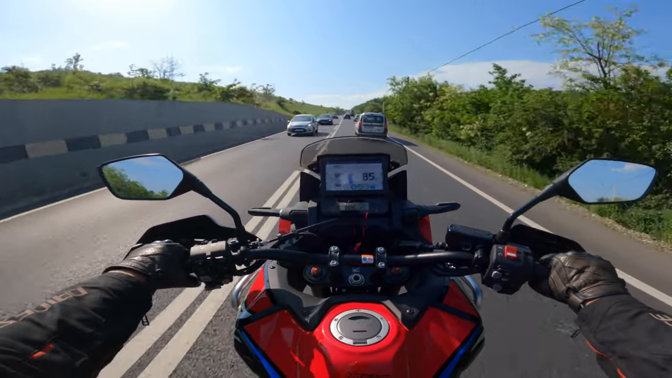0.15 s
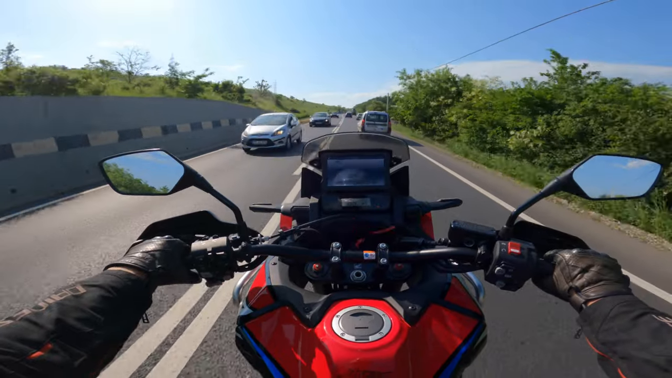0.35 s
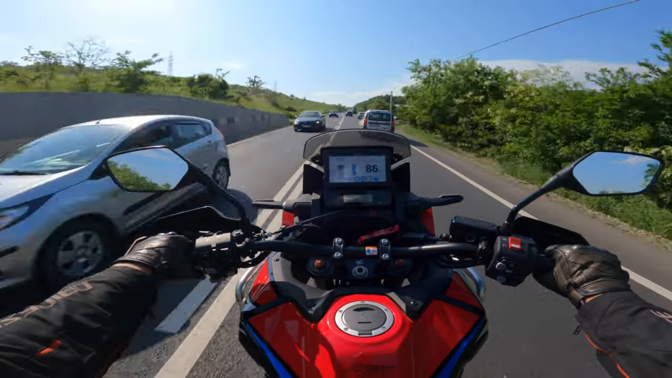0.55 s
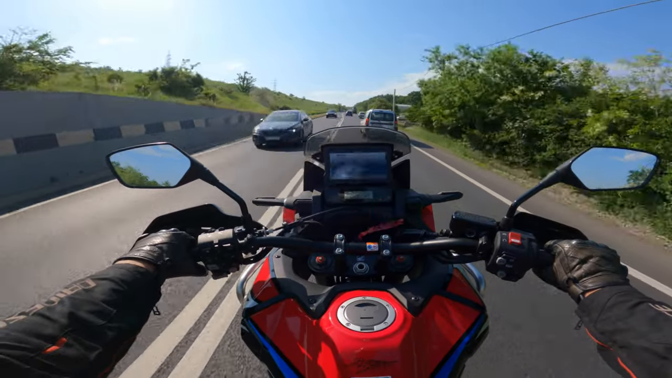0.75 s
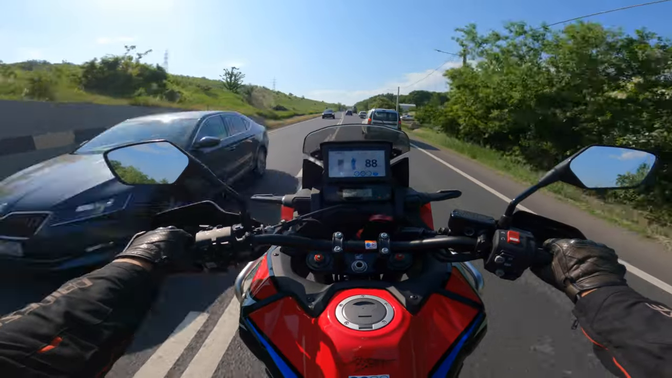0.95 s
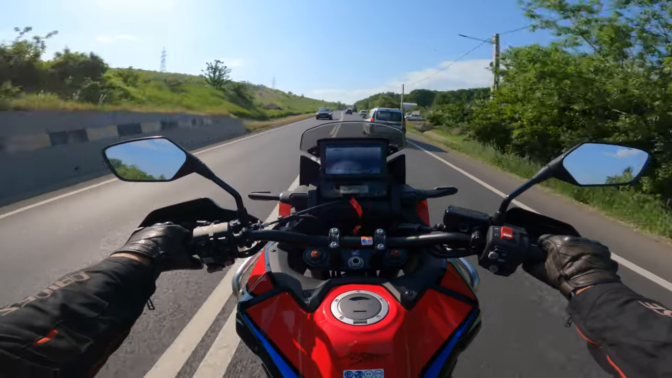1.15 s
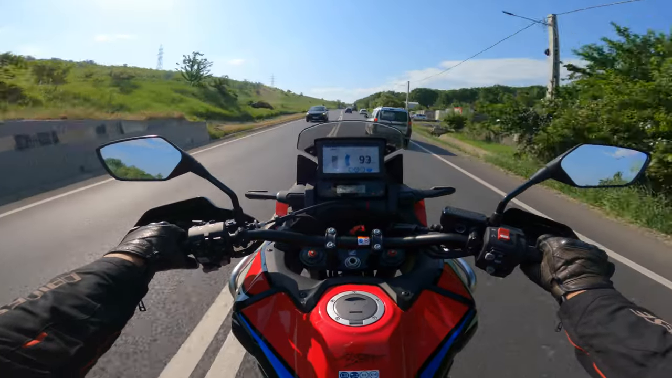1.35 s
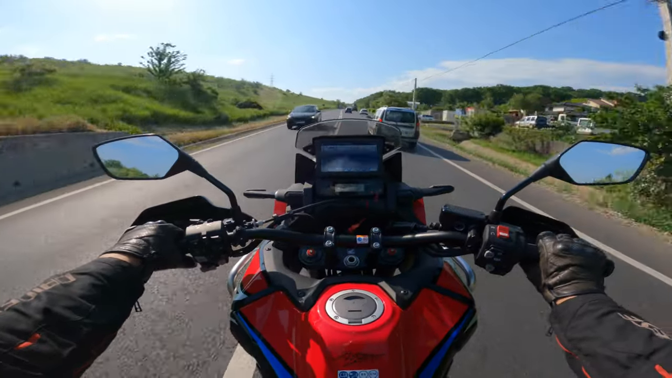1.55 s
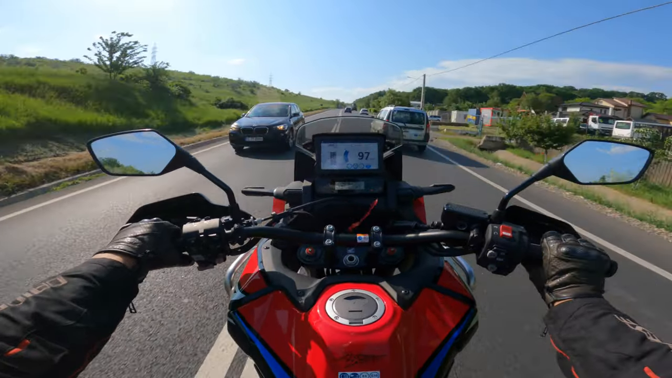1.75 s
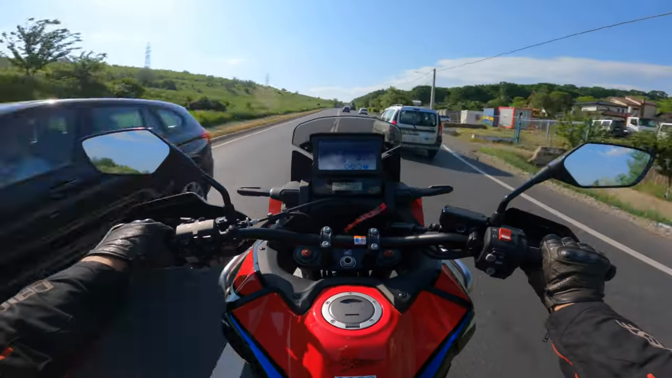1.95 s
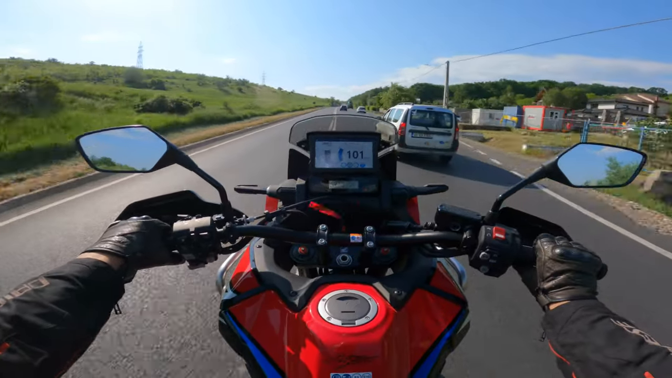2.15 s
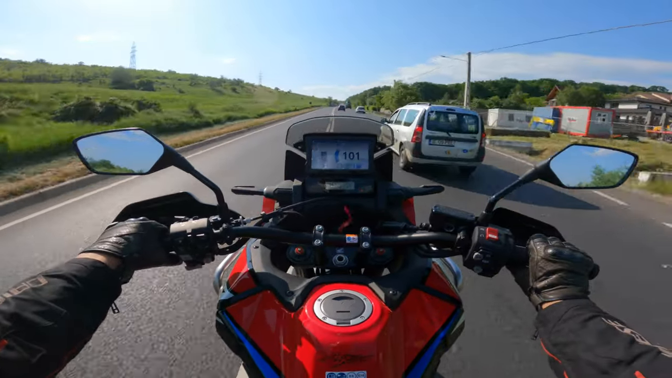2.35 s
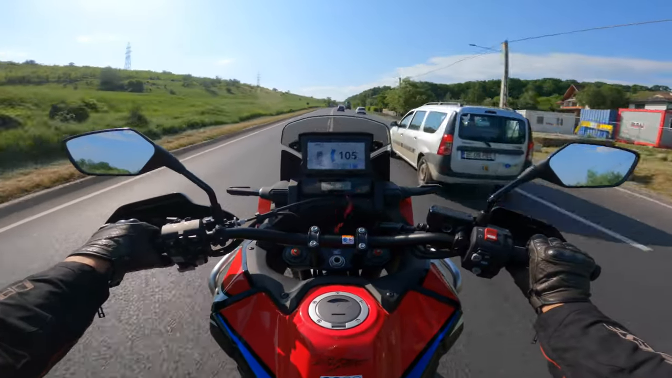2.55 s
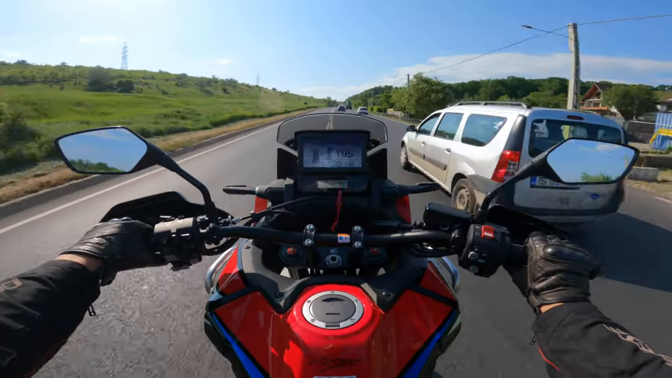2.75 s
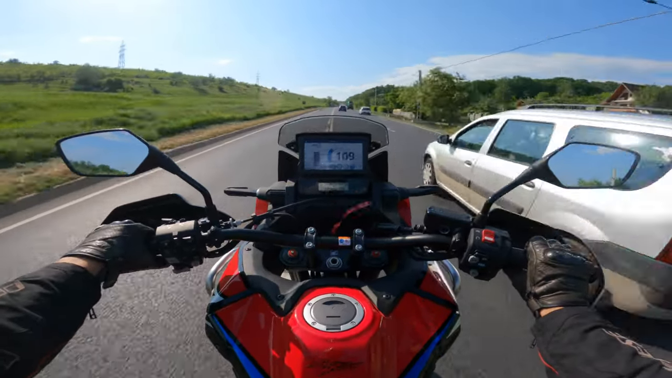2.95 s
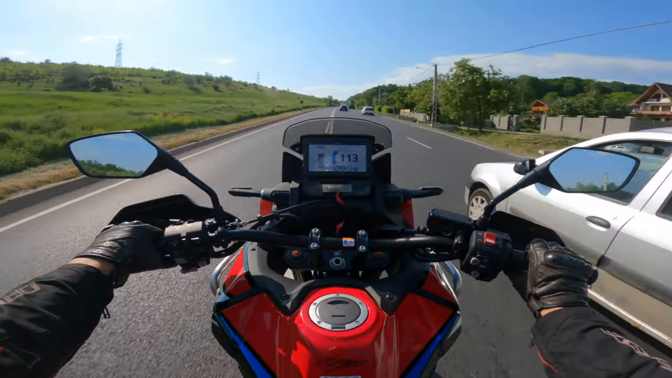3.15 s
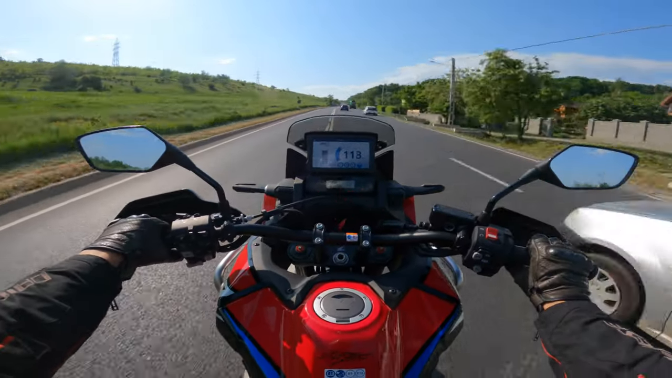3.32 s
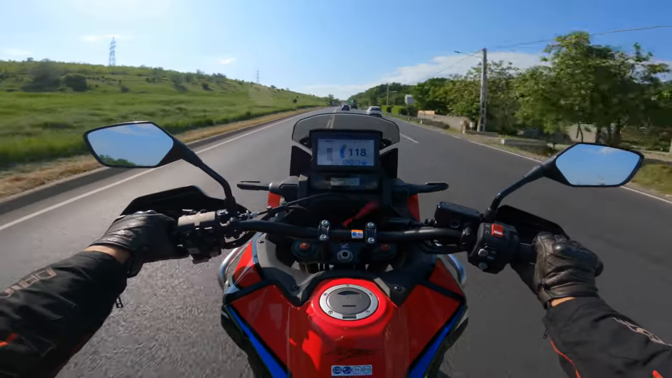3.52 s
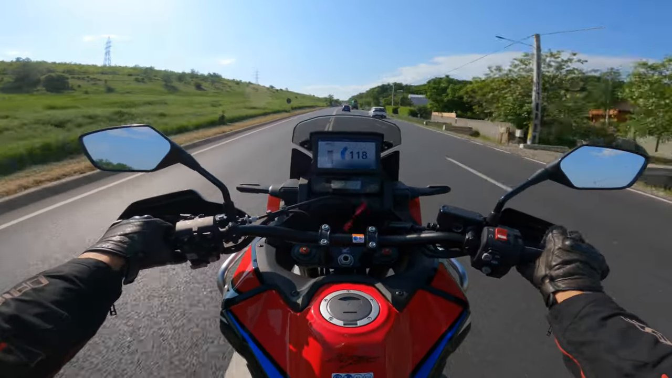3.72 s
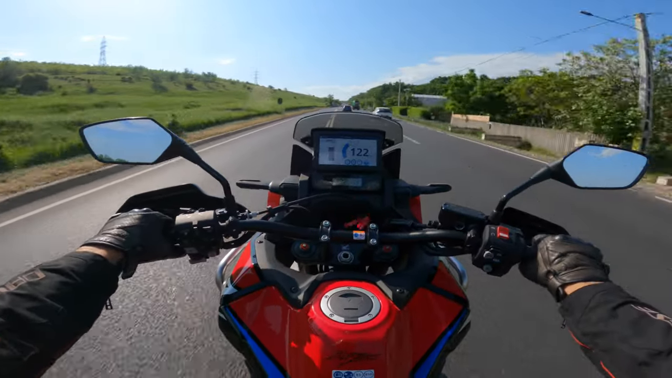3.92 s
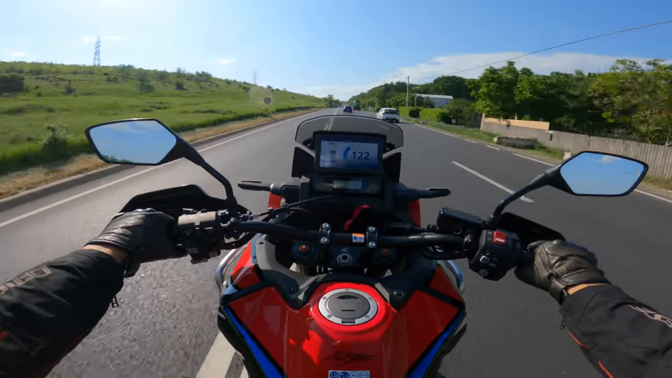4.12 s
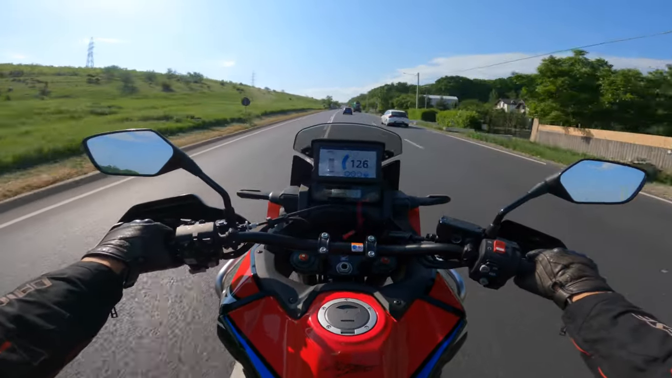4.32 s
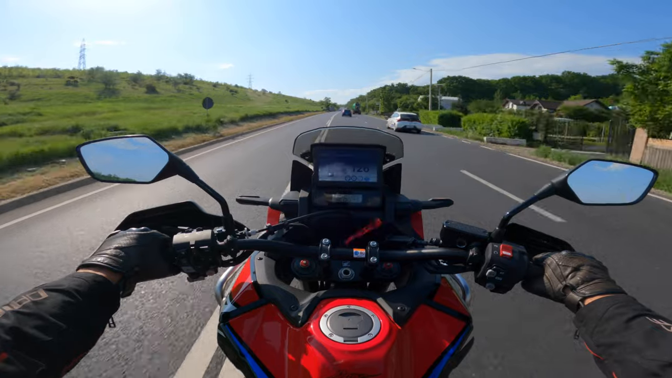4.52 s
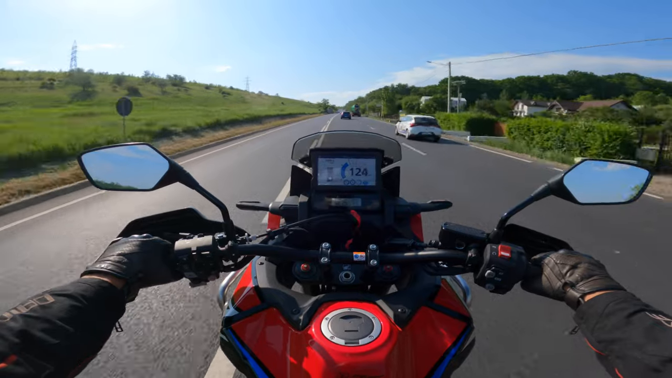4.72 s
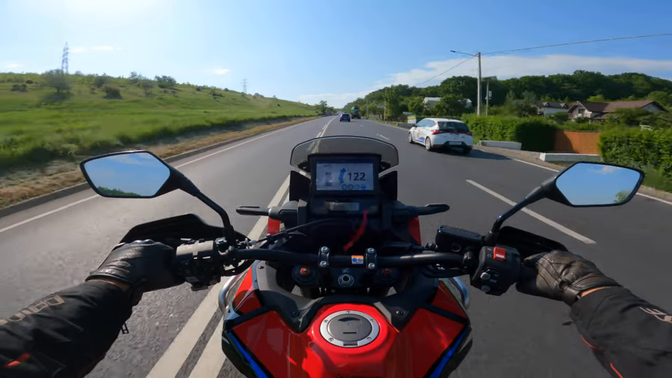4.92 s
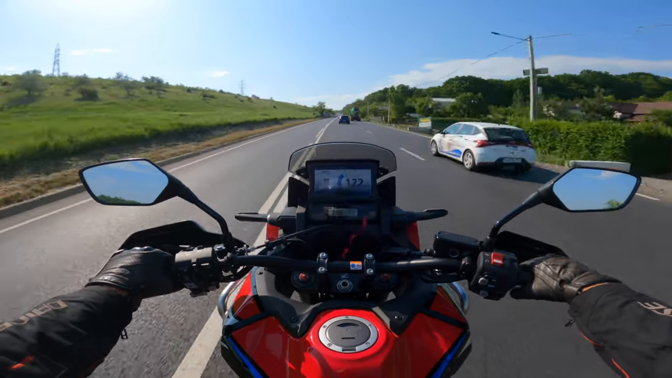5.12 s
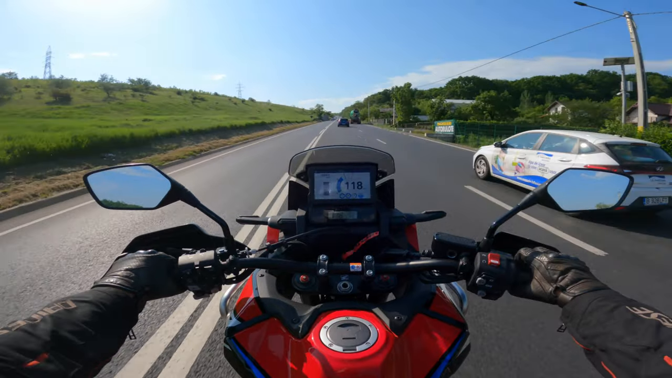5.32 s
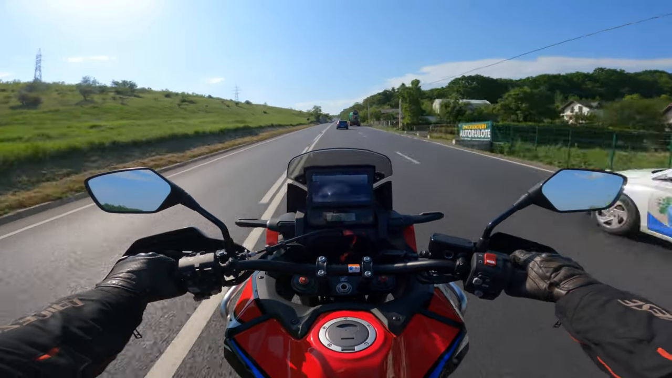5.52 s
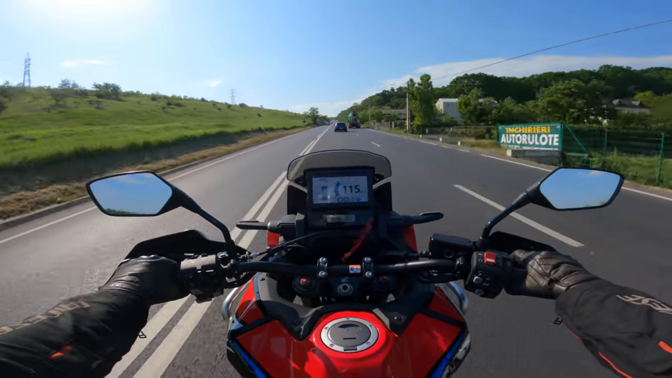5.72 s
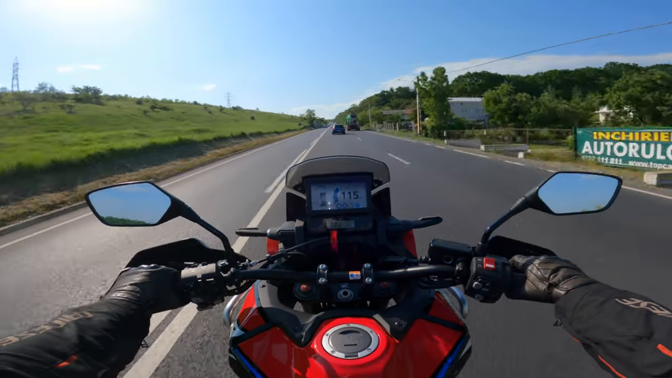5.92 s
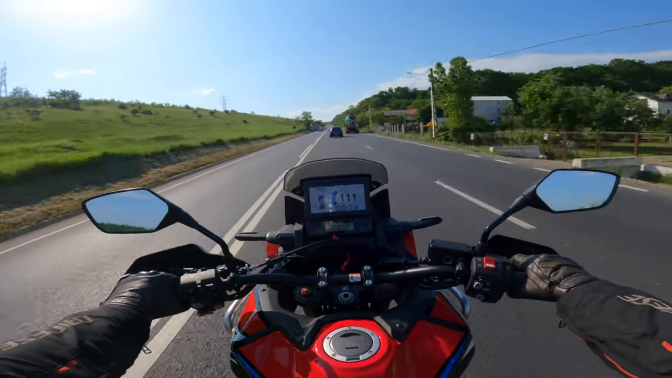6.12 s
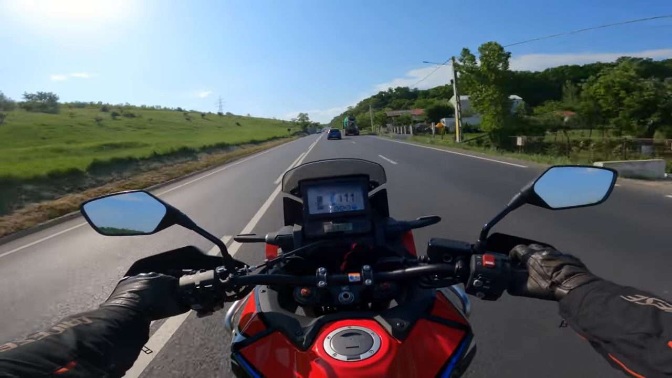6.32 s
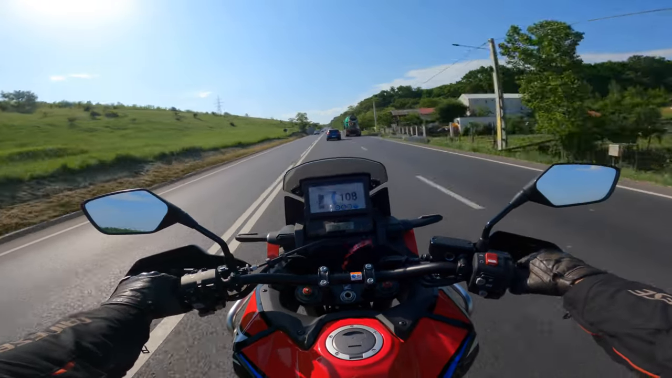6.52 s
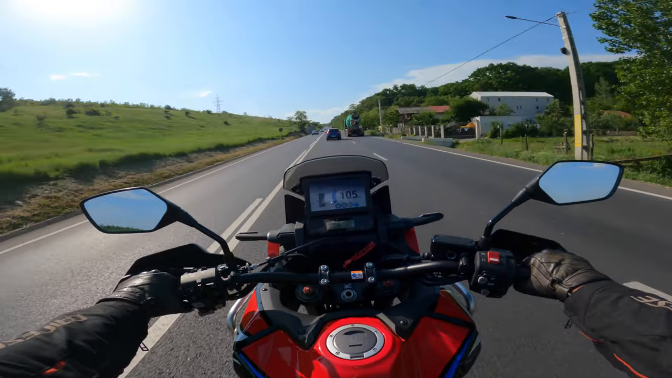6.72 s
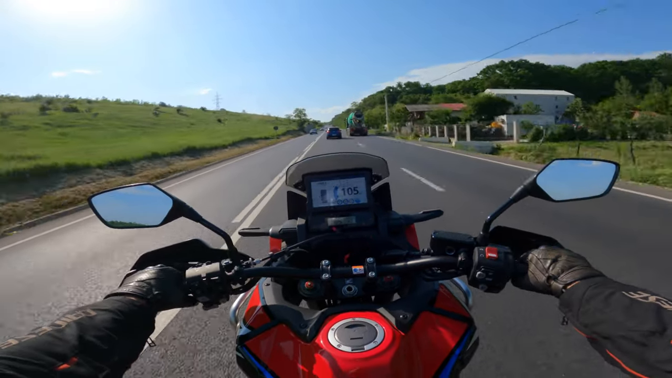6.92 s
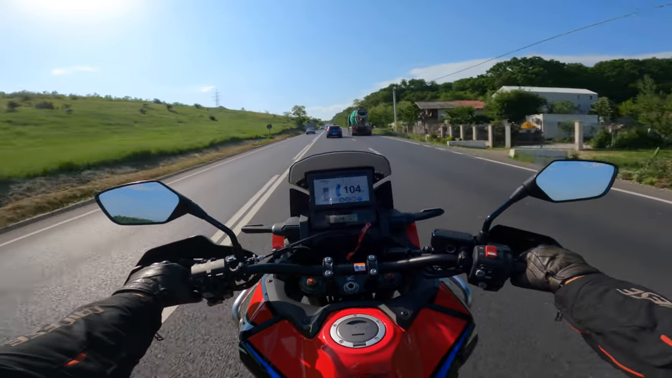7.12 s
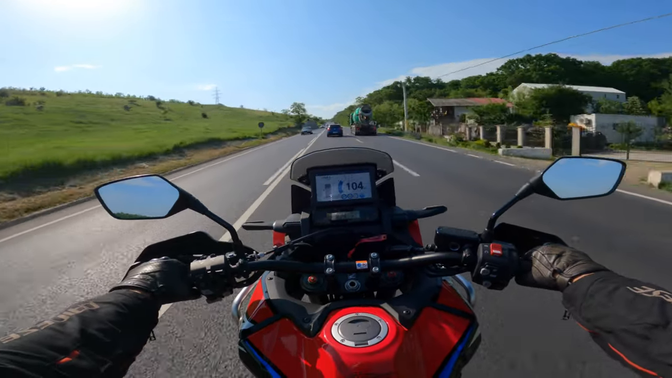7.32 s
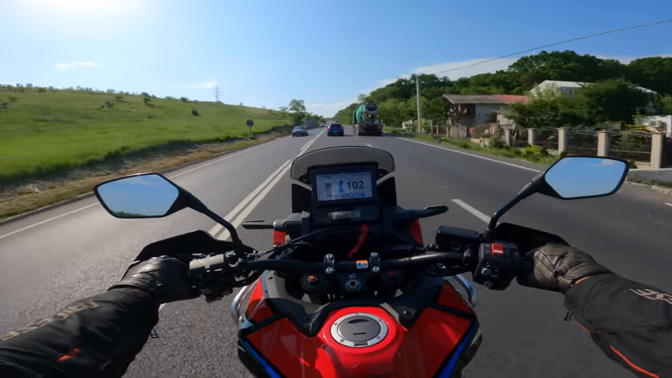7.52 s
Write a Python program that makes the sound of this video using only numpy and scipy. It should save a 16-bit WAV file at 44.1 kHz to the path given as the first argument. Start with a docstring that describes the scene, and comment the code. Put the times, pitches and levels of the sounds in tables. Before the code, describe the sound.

A two-cylinder motorcycle is heard from the rider's chest on an open road. The engine climbs steadily in pitch with a honking, rasping intake growl while oncoming cars give faint, brief hisses. About halfway the throttle shuts and the exhaust burbles as the pitch falls. Near the end the drive clunks with a small touch of throttle. Low wind buffeting, chain whine and engine clatter run throughout.

```python
"""Wind rumbles and a two-cylinder motorcycle speeds up to overtake, heard from the rider's chest.
With the throttle open, gulps of air make the airbox (the engine's air chamber) honk and rasp.
Then the throttle shuts, and weak firings burble in the exhaust pipe as the bike slows.
The drive chain whines with road speed, the engine clatters, and wind buffets the microphones."""
import sys
import numpy as np
from scipy import signal
from scipy.fft import rfft, irfft
from scipy.io import wavfile

SR = 44100
rng = np.random.default_rng(int(sys.argv[2]) if len(sys.argv) > 2 else 0)


def materialize(psi):
    """Save the field psi as 16-bit PCM at rate SR to the path in sys.argv[1].

    A 1-D psi becomes a single channel; in a 2-D psi each row is a channel.
    """
    bounded = np.clip(np.atleast_2d(psi).T, -1, 1)
    quanta = np.round(bounded * 32767).astype(np.int16)
    wavfile.write(sys.argv[1], SR, quanta)


N = 337806
TIME = np.arange(N) / SR
FREQS_HZ = np.fft.rfftfreq(N, 1 / SR)
INTAKE_LAG_S, RASP_LAG_S, EXHAUST_LAG_S = 0.12, 0.13, 0.16  # delays in following the throttle

# The two cylinders fire unevenly: place_in_cycle (0-1), strength
FIRINGS = [(0.428, 0.86), (0.803, 0.88)]
# Notes at which the engine cases ring: pitch_hz, width_hz, level_db
CASE_NOTES = [(1273, 20, -56.5), (1695, 53, -64), (2224, 70, -66)]


def gain_of(db):
    """Turn decibels into a volume multiplier."""
    return 10 ** (np.asarray(db) / 20)


def spectrum(rows, column=1):
    """Turn one column of decibels into a gain at every frequency."""
    rows = np.array(rows)
    return gain_of(np.interp(np.log(FREQS_HZ + 1), np.log(rows[:, 0]), rows[:, column]))


def bumps(hz, rows):
    """The gain at hz of a set of peaks and dips."""
    return gain_of(sum((db * np.exp(-((hz - centre) / width) ** 2) for centre, width, db in rows), 0 * hz))


def filtered(sound, gains):
    """Turn each frequency up or down by its own gain."""
    return irfft(rfft(sound) * gains, N)


def noise(shape):
    """Noise whose strength at each frequency follows the shape."""
    real, imaginary = rng.standard_normal((2, len(FREQS_HZ)))
    return irfft((real + 1j * imaginary) * shape, N) * np.sqrt(N * SR) / 2


def stereo_noise(rows):
    """Left and right noise: mid is what the ears share, side is how they differ."""
    mid, side = noise(spectrum(rows, column=1)), noise(spectrum(rows, column=2))
    return np.array([mid + side, mid - side])


def wander(hz, size=8192):
    """A smooth random wobble, about 1 in size, that changes up to hz times a second."""
    rates = np.fft.rfftfreq(size, TIME[-1] / size)
    slow = irfft(rfft(rng.standard_normal(size)) / (1 + (rates / hz) ** 4))
    return np.interp(TIME, np.linspace(0, TIME[-1], size), slow / slow.std())


def fuzzy_tone(cycles, width_hz):
    """A narrow band of noise that follows a pitch."""
    angle = 2 * np.pi * cycles
    return wander(width_hz / 2) * np.cos(angle) + wander(width_hz / 2) * np.sin(angle)


def swell(peak_s, length_s):
    """A smooth rise to 1 and back around a moment."""
    return np.exp(-(2 * (TIME - peak_s) / length_s) ** 2)


def puffs(events, hz, octaves):
    """Brief swells of one band of noise; high bands differ more between the ears."""
    band = np.exp(-np.log2((FREQS_HZ + 1) / hz) ** 2 / (2 * octaves ** 2))
    ears = np.array([noise(band), noise(band)])
    ears = ears + ears[::-1] / (1 + hz / 1500)
    return ears / ears.std() * sum(gain_of(db) * swell(s, length) for s, length, db in events)


def lagged(control, lag_s):
    """Follow a control sluggishly."""
    hold = np.exp(-1 / (lag_s * SR))
    return control[0] + signal.lfilter([1 - hold], [1, -hold], control - control[0])


def doublings(speed, cruise=40):
    """How many times the speed has doubled from cruising, in engine cycles a second."""
    return np.log2(speed / cruise)


def load_db(pull, source):
    """How loud one source is at this pull, from engine braking (negative) to full throttle."""
    # Loudness under load: pull_cycles_per_s2, honk_db, rasp_db, burble_db, chain_db, clatter_db
    levels = [(-5, -43, -32, -6.5, -39.5, -6.5), (-3.5, -47, -30, -2, -38, -2),
              (0, -40, -27.5, -9, -40, -3), (-0.5, -39, -21.5, -15, -37.5, -2.5),
              (2.5, -33, -10.5, -15.5, -38.5, -0.5), (3.5, -33, -7, -19.5, -34, -2.5),
              (3.5, -30.5, -6, -18, -33, -4.5), (4.5, -30.5, -8, -17.5, -32.5, -5),
              (4, -31, -7.5, -16, -33, -1.5)]
    pulls, *columns = np.array(levels).T
    return np.interp(pull, pulls, columns[["honk", "rasp", "burble", "chain", "clatter"].index(source)])


def wind(road_speed):
    """Lumpy buffeting on the microphones grows with road speed and jumps in gusts."""
    # Buffeting: pitch_hz, mid_db, side_db
    rumble = [(10, -71.5, -79.5), (25, -61, -58), (45, -55.5, -64), (70, -57.5, -54), (98, -62, -61),
              (182, -70.5, -69), (372, -78.5, -82.5), (1000, -105, -105), (4000, -140, -140)]
    # Gusts, lulls and the wakes of cars: peak_s, length_s, boost_db
    gusts = [(1.08, 0.18, 1.5), (1.697, .12, 5), (2.121, .14, 4), (3.37, 0.23, 3), (4.74, .25, 2.5),
             (6.77, .14, 4), (7.3, .7, -2.5)]
    gust_db = sum(boost * swell(s, length) for s, length, boost in gusts)
    return stereo_noise(rumble) * gain_of(0.64 + 17.5 * doublings(road_speed) + gust_db + 0.38 * wander(11))


def crackle(road_speed, snaps_per_s=350, spread_db=5):
    """Rough air makes the microphone cover crackle in clumps of tiny bright snaps."""
    # Spells of rough air: peak_s, length_s, boost_db
    rough_air = [(3.8, .9, 19), (5.75, 0.66, 7), (7.45, .3, 4)]
    sizes = gain_of(spread_db * np.minimum(rng.exponential(1, (2, N)), 5))
    hits = (rng.random((2, N)) < snaps_per_s / SR) * sizes
    snap = rng.standard_normal((2, 128)) * np.exp(-np.arange(128) / 22)
    snaps = signal.oaconvolve(hits * rng.choice([-1, 1], (2, N)), snap, axes=1)[:, :N]
    bright = np.exp(-np.log2((FREQS_HZ + 1) / 9000) ** 2)
    clumps = filtered(snaps, bright) * gain_of(3 * wander(17))
    rough_db = sum(boost * swell(s, length) for s, length, boost in rough_air)
    return clumps / clumps.std() * gain_of(-83 + 10.5 * doublings(road_speed) + rough_db)


def passing_cars():
    """Oncoming cars sweep past with a hiss."""
    # Cars: peak_s, length_s, level_db
    cars = [(0.718, .08, -76), (1.126, 0.12, -73), (2.08, .09, -64.5)]
    return puffs(cars, hz=7800, octaves=.32)


def rustles_and_ticks(tick_s=0.0027):
    """Short bright rustles in the wind, and a few sharp ticks."""
    # Rustles: peak_s, length_s, level_db
    rustles = [(2.338, .018, -71), (2.4, .022, -67), (2.615, .02, -71), (3.06, .015, -67),
               (3.14, .015, -67), (5.288, .02, -72), (5.8, .025, -68), (5.928, .035, -65),
               (5.977, .03, -66), (6.85, 0.029, -67)]
    # Ticks: peak_s, level_db
    ticks = [(6.648, -58), (7.355, -62), (7.547, -63)]
    rustling = puffs(rustles, hz=11500, octaves=.55)
    return rustling + puffs([(s, tick_s, db) for s, db in ticks], hz=8800, octaves=.52)


def drive_clunks():
    """The drive clunks as it takes up its slack."""
    # Clunks: peak_s, length_s, pitch_hz, level_db
    clunks = [(5.01, 0.029, 3500, -68), (6.778, 0.11, 89, -29.5), (6.823, 0.0092, 1500, -45.5)]
    return sum(puffs([(s, length, db)], hz, octaves=.52) for s, length, hz, db in clunks)


def chain(road_speed, pull, links_per_cycle=15.17, taut_db=-3.5, slack_boost_db=7):
    """Chain links strike the toothed wheel: a whine that grows under load, and a rattle when slack."""
    # Chain tones, the main whine first: multiple_of_link_rate, level_db, width_hz
    tones = [(1, 0, 2), (.99, -10, 80), (.977, -10, 2), (.945, -13, 2), (.88, -15, 2), (1.048, -14, 4),
             (2, -31, 8)]
    links = np.cumsum(links_per_cycle * road_speed * (1 + .0012 * wander(10))) / SR
    (multiple, db, width), *side_tones = tones
    whine = np.sqrt(2) * gain_of(db + 1.1 * wander(3 * width)) * np.sin(2 * np.pi * multiple * links)
    rattle = sum(gain_of(db) * fuzzy_tone(multiple * links, width) for multiple, db, width in side_tones)
    tension = lagged(pull, INTAKE_LAG_S)
    loose = gain_of(taut_db + slack_boost_db * np.exp(-tension ** 2))
    return (whine + rattle * loose) * gain_of(load_db(tension, "chain") + 10.5 * doublings(road_speed))


def bodywork(sound):
    """Reflections between the fuel tank and the front panels colour the noise."""
    # Peaks and dips: pitch_hz, width_hz, boost_db
    colour = [(1110, 35, 3), (1150, 70, 0), (1640, 99, 2.5), (1980, 45, -1), (2446, 80, -3.5),
              (2770, 86, 1), (3030, 110, 2), (3340, 190, -1), (4140, 170, -0.5), (4640, 160, -2),
              (5130, 130, -0.5), (7250, 470, 2), (8000, 300, -1)]
    return filtered(sound, bumps(FREQS_HZ, colour))


def bursts(cycles, strokes, lag, width, floor):
    """A loudness shape that rises once for each cylinder; lag and width are parts of a cycle."""
    opening = floor
    for place, strength in strokes:
        distance = (cycles - place - lag + .5) % 1 - .5
        opening = opening + strength * np.exp(-(distance / width) ** 2)
    return opening / np.sqrt(np.mean(opening ** 2))


def gears(cycles, revs):
    """Each gear tone swells as it glides through a ringing note of the engine cases."""
    # Gear whines: multiple_of_cycle_rate, level_db
    whines = [(29, -68), (40, -70.5), (59, -69), (61, -79.5)]
    peaks = [(hz, 70, 9) for hz, _, _ in CASE_NOTES]
    return sum(gain_of(db + 1.6 * wander(5)) * bumps(k * revs, peaks) * np.sin(2 * np.pi * k * cycles)
               for k, db in whines)


def valves(cycles, size=1024):
    """The valves repeat one pattern of fine ticks every cycle, which makes a high buzz."""
    pattern = irfft(np.exp(2j * np.pi * rng.random(size // 2 + 1)))
    ticks = np.interp(cycles % 1 * size, np.arange(size), pattern / pattern.std())
    bass_cut = 1 - np.exp(-(FREQS_HZ / 1300) ** 4)
    return filtered(ticks, bumps(FREQS_HZ, [(2100, 2500, 41.5)]) * gain_of(-47) * bass_cut)


def clatter(cycles, revs, pull):
    """Mechanical noise throbs with the firings and rings the cases; gears and valves sing along."""
    # Engine clatter and tyre roar: pitch_hz, mid_db, side_db
    roar = [(120, -71, -78), (383, -66, -80), (637, -59, -69), (763, -70.5, -79.5), (1060, -82.5, -71.5),
            (1440, -85, -88), (1680, -85, -86.5), (2230, -87.5, -93), (2830, -94.5, -105.5),
            (3650, -99, -103), (4940, -102, -109), (5650, -112, -114), (10500, -117, -116),
            (15500, -124, -124)]
    throb = bursts(cycles, FIRINGS, lag=0.084, width=0.21, floor=2.2) * gain_of(0.46 * wander(84))
    ring = np.array([sum(gain_of(db) * fuzzy_tone(hz * TIME, width) for hz, width, db in CASE_NOTES)
                     for _ in range(2)])
    ticking = gain_of(-50) * np.array([valves(cycles), valves(cycles)])
    level = gain_of(load_db(lagged(pull, INTAKE_LAG_S), "clatter") + 15 * doublings(revs))
    return (bodywork(stereo_noise(roar) * throb + ticking) + ring + gears(cycles, revs)) * level


def treble(pulses):
    """The part of the pulses above about 720 Hz."""
    return filtered(pulses, 1 - np.exp(-(FREQS_HZ / 720) ** 6))


def pulse_pair(cycles, revs, strokes, resonances, duct, ring_hz, damping):
    """Two pressure pulses a cycle, built of overtones that swell as they cross any resonances."""
    # Overtones of the engine: multiple_of_cycle_rate, intake_db, exhaust_db
    overtones = [(1, -24.5, -17), (2, 1.5, 2), (3, 1, 5.5), (4, -8, -16.5), (5, -2, 1.5), (6, 0.5, -5),
                 (7, -8.5, -27.5), (8, -9.5, -10.5), (9, -7.5, -12), (10, -15.5, -5), (11, -9, -8),
                 (12, -22, -7), (13, -18.5, -21), (14, -12.5, -20.5), (15, -25, -30.5), (16, -15.5, -30.5),
                 (17, -14.5, -12.5), (18, -19, -14.5), (19, -27.5, -21.5), (20, -22.5, -25.5),
                 (21, -22.5, -16.5), (22, -29.5, -16), (23, -23.5, -25.5), (24, -23.5, -19.5),
                 (25, -30.5, -28.5), (26, -26, -31.5), (27, -27.5, -22.5), (28, -35.5, -39.5),
                 (29, -36.5, -40), (30, -34, -31.5), (31, -32, -33), (32, -34.5, -43.5), (33, -28.5, -43.5),
                 (34, -35, -36.5)]
    hz = np.linspace(1, 2000, 1000)
    ring = 1 / (damping + 1j * (hz / ring_hz - ring_hz / hz))
    # The duct holds its own note back, so each pulse rings on.
    response = bumps(hz, resonances) * (ring / abs(ring)) ** 2
    pulses = 0
    for k, intake_db, exhaust_db in overtones:
        level = gain_of(intake_db if duct == "intake" else exhaust_db)
        timing = sum(strength * np.exp(-2j * np.pi * k * place) for place, strength in strokes)
        tone = np.exp(2j * np.pi * k * cycles) * timing / abs(timing)
        pulses = pulses - level * (np.interp(k * revs, hz, response) * tone).real
    return np.sqrt(2) * pulses


def exhaust(cycles, revs, pull, lurch):
    """Weak, uneven firings thud in the pipe with the throttle shut, and spit during the long coast."""
    # Gas hissing from the pipe: pitch_hz, mid_db, side_db
    hiss = [(400, -83, -100), (850, -80.5, -75), (1130, -90.5, -80), (1450, -94.5, -89.5),
            (2000, -95.5, -92), (3060, -100, -100), (4900, -108, -112), (7000, -125, -125)]
    # The long coast, when the pipe turns raspy: start_s, end_s, fade_s, spit_db
    coast = (5.0, 6.82, .05, 2.4)
    start_s, end_s, fade_s, spit_db = coast
    coasting = (np.tanh((TIME - start_s) / fade_s) - np.tanh((TIME - end_s) / fade_s)) / 2
    thuds = pulse_pair(cycles, revs, FIRINGS, [], "exhaust", ring_hz=680, damping=0.34)
    thuds = thuds + (0.87 * coasting - .75) * treble(thuds)  # bright in the coast, muffled outside it
    burble_db = load_db(lagged(pull, EXHAUST_LAG_S), "burble") + 5.5 * doublings(revs)
    level = gain_of(burble_db - 2.9 * abs(lurch) + 0.4 * wander(53))  # falters while the drive is slack
    spurts = bursts(cycles, FIRINGS, lag=.03, width=.06, floor=.1)
    spit = bodywork(stereo_noise(hiss) * spurts) * coasting * gain_of(spit_db)
    return (gain_of(-36) * thuds + spit) * level


def intake(cycles, revs, pull, lurch, close_s=7.3, fade_db_per_s=45):
    """Each gulp of air thumps the airbox (the honk) and tears past the throttle plate (the rasp)."""
    # The two cylinders draw air unevenly: place_in_cycle (0-1), strength
    gulps = [(0.274, 0.98), (0.609, 0.63)]
    # Resonances of the airbox and tank: pitch_hz, width_hz, boost_db
    airbox = [(63, 13.6, -12.5), (84.8, 6, -5), (203, 25.5, 4), (244.4, 15.7, 4.5), (274.9, 17.7, 8.5),
              (308.4, 6.6, 6.5), (368.5, 22, -5.5), (473, 23, 2.5), (494, 76, 6.5), (583, 39, 3),
              (790, 80, 9), (1220, 230, -13)]
    # Rushing air: pitch_hz, mid_db, side_db
    rush = [(60, -75.5, -86), (170, -70.5, -79.5), (400, -56.5, -67), (640, -58, -62), (1000, -66.5, -62),
            (1280, -77, -69), (1680, -71, -67), (2550, -79.5, -82.5), (3640, -85, -88),
            (5050, -84.5, -85.5), (5660, -96.5, -100), (7450, -99, -100), (10900, -106, -105),
            (15500, -116, -117)]
    # The revs where the engine breathes best: cycles_per_s, width_cycles_per_s, boost_db
    power_band = (43, 1.8, 1.1)
    honk_db = load_db(lagged(pull, INTAKE_LAG_S), "honk") + 11 * doublings(revs) + 3 * lurch
    rasp_db = load_db(lagged(pull, RASP_LAG_S), "rasp") + 15 * doublings(revs)
    honk = pulse_pair(cycles, revs, gulps, airbox, "intake", ring_hz=400, damping=.45)
    honk = honk * gain_of(honk_db + .5 * wander(27))
    muffling = np.clip(-(rasp_db + 15) / 18, 0, .7)  # a closing throttle dulls the honk
    grit = gain_of(wander(76) + 2 * wander(900))
    gulping = bursts(cycles, gulps, lag=.03, width=.065, floor=.33)
    rasp = stereo_noise(rush) * gulping * grit * bumps(revs, [power_band]) * gain_of(rasp_db)
    fade = gain_of(-fade_db_per_s * np.maximum(TIME - close_s, 0))  # the throttle snaps fully shut
    return (honk - muffling * treble(honk) + bodywork(rasp)) * fade


def scene(start_speed=29.925, lurch_s=.12):
    """The throttle's pull builds the speed; revs and road speed both count engine cycles a second."""
    # The rider opens the throttle, shuts it, opens it a crack, shuts it: time_s, pull_cycles_per_s2
    throttle = [(0, .381), (.37, 2.05), (1.58, 3.955), (3.62, 4.312), (4.11, 3.13), (4.25, -1.593),
                (4.67, -1.278), (4.82, -3.964), (6.71, -2.928), (6.76, -.891), (7.07, .349), (7.27, -2.922),
                (7.66, -4.896)]
    # The revs jump while the drive crosses its slack: peak_s, jump_cycles_per_s
    lurches = [(4.98, -1.533), (6.88, 1.724)]
    pull = np.interp(TIME, *np.transpose(throttle))
    road_speed = start_speed + np.cumsum(pull) / SR
    lurch = sum(jump * swell(s, lurch_s) for s, jump in lurches)
    revs = road_speed + lurch
    cycles = np.cumsum(revs) / SR  # one running count keeps the engine's sounds in step
    breathing = intake(cycles, revs, pull, lurch) + exhaust(cycles, revs, pull, lurch)
    bike = breathing + clatter(cycles, revs, pull) + chain(road_speed, pull)
    background = wind(road_speed) + crackle(road_speed) + passing_cars() + rustles_and_ticks()
    return background + bike + drive_clunks()


def record(dry, top_hz=15750):
    """The two microphones colour the sound differently, and the highest treble is cut."""
    # Balance between the microphones: pitch_hz, left_minus_right_db
    balance = [(30, 1), (60, -1.5), (110, 3), (200, 4), (380, 0.5), (700, -0.5), (1290, -1.5), (2380, 2),
               (4400, 2), (8100, -1.5), (15000, 2)]
    lean = np.sqrt(spectrum(balance))
    heard = filtered(dry, np.array([lean, 1 / lean]))
    treble_cut = signal.firwin(511, top_hz, window=("kaiser", 9), fs=SR)
    return signal.oaconvolve(heard, treble_cut[None], "same")


dry = scene()
out = record(dry)
materialize(out)
```